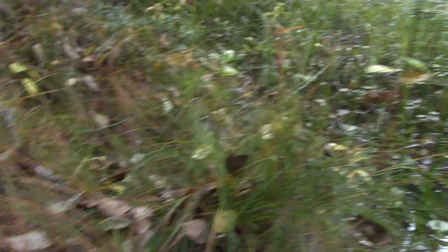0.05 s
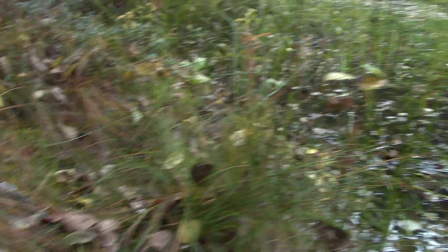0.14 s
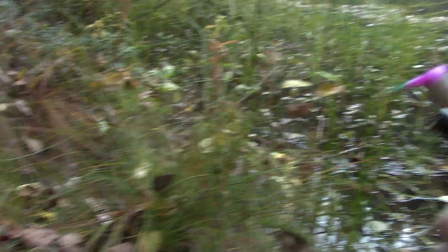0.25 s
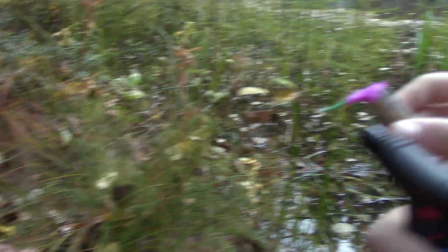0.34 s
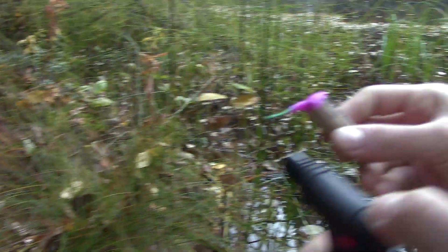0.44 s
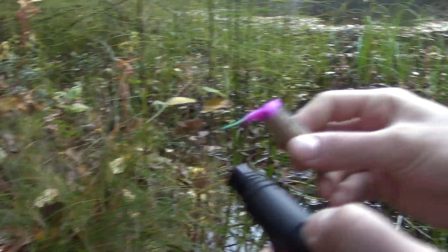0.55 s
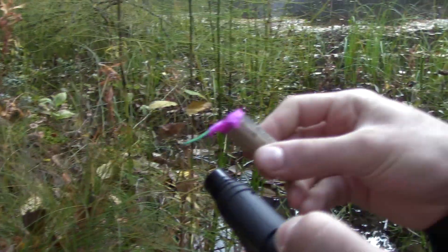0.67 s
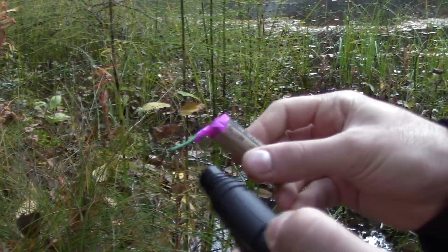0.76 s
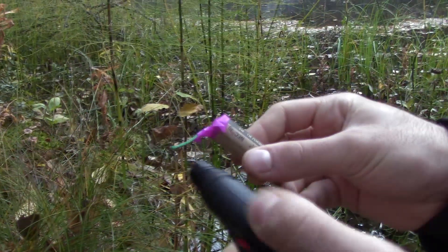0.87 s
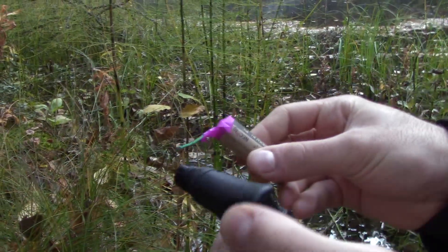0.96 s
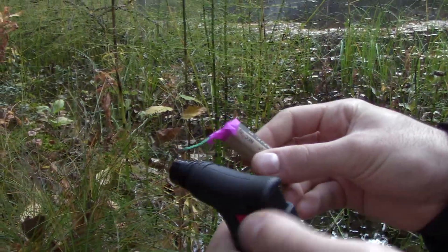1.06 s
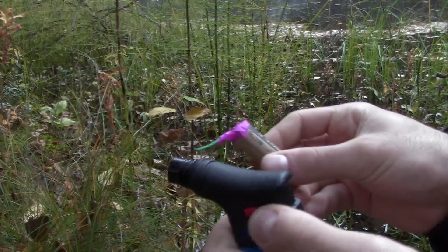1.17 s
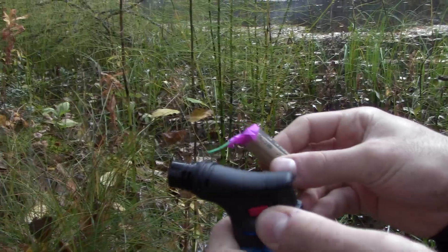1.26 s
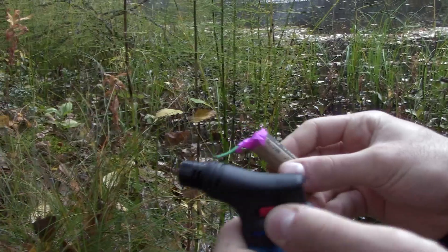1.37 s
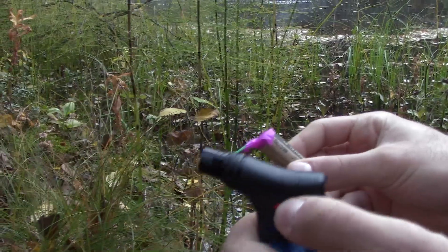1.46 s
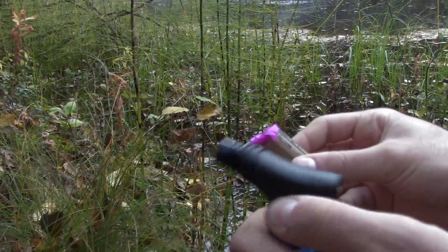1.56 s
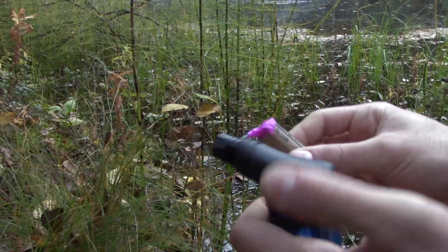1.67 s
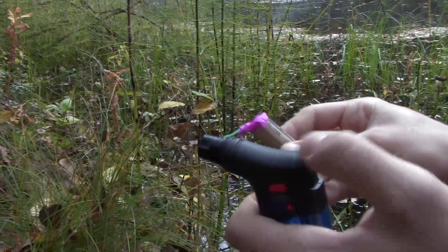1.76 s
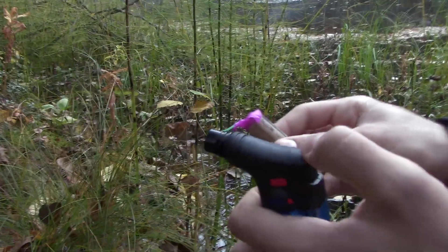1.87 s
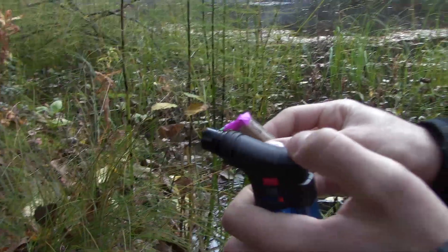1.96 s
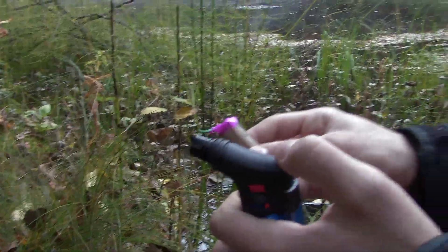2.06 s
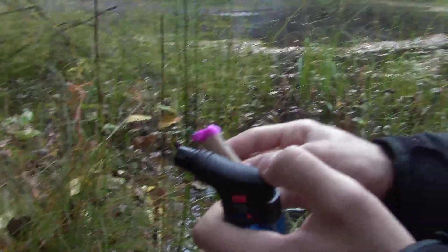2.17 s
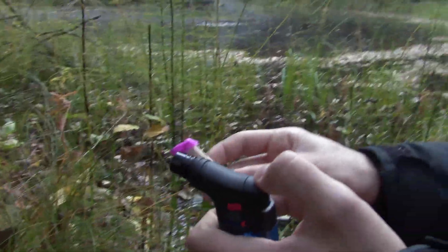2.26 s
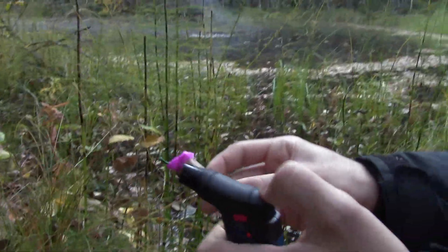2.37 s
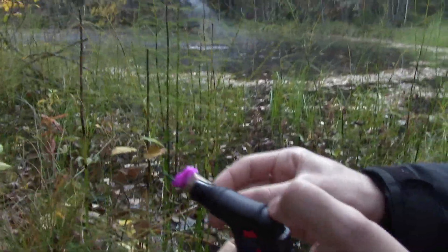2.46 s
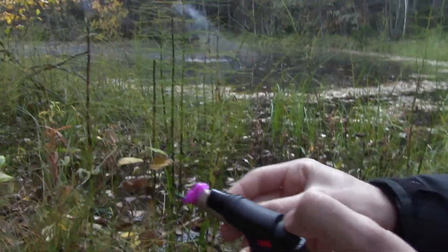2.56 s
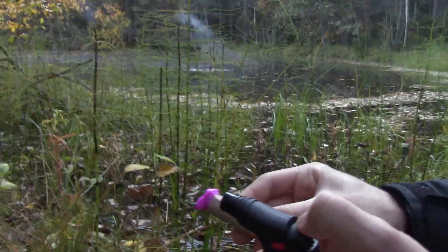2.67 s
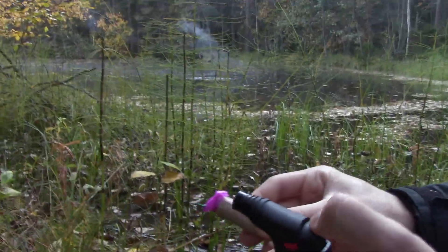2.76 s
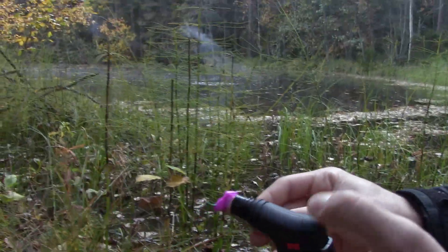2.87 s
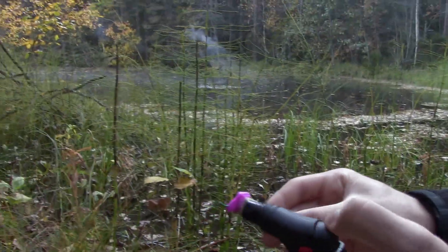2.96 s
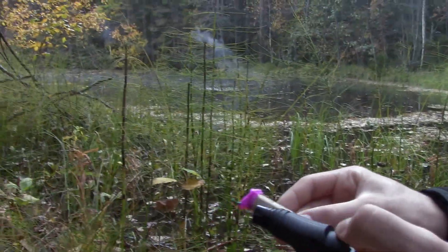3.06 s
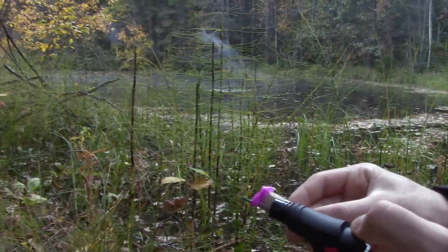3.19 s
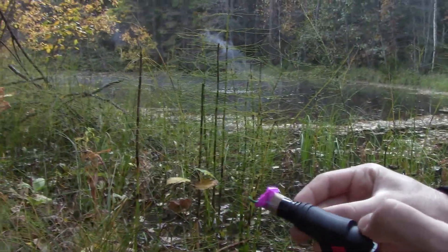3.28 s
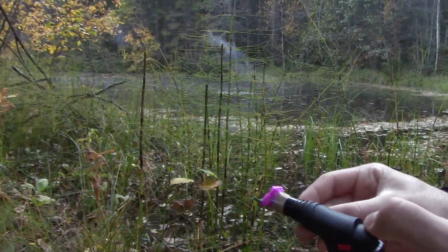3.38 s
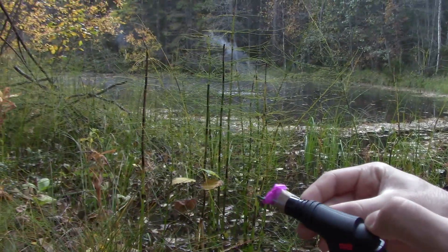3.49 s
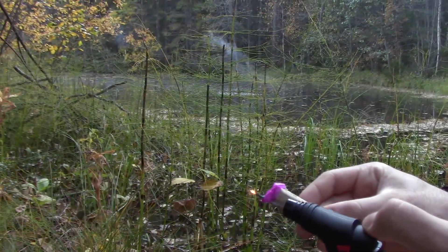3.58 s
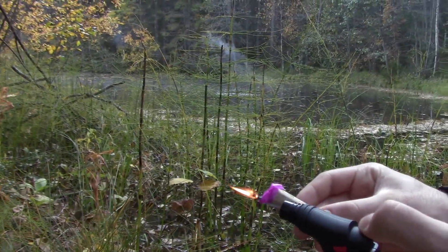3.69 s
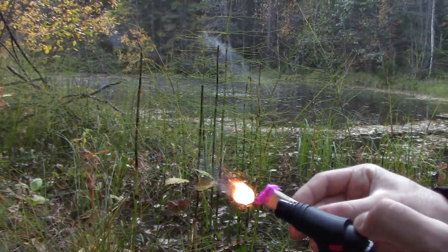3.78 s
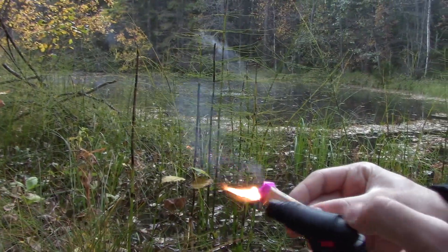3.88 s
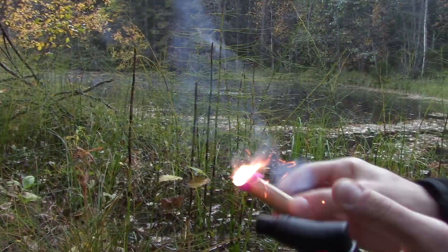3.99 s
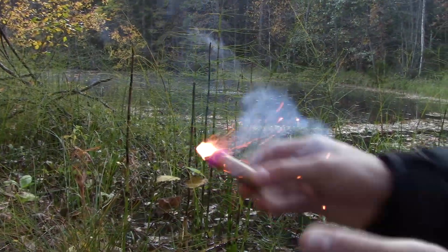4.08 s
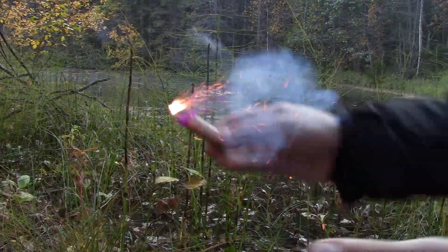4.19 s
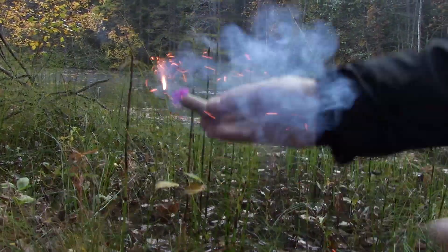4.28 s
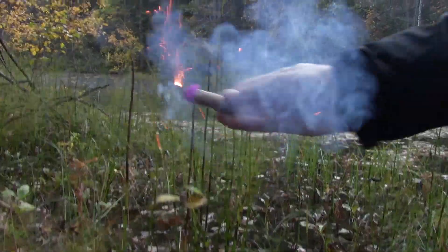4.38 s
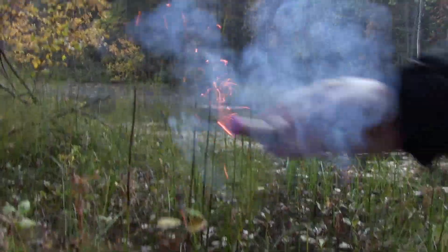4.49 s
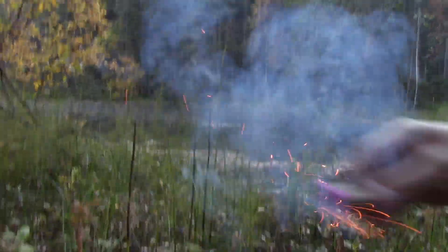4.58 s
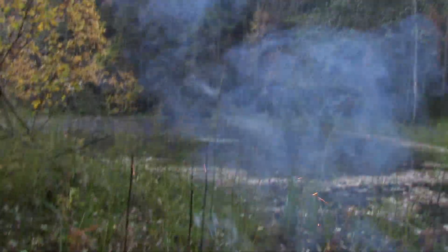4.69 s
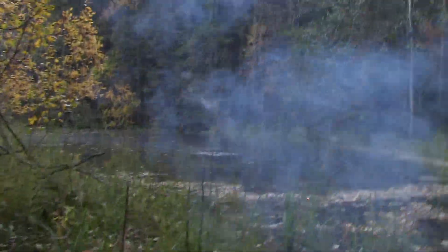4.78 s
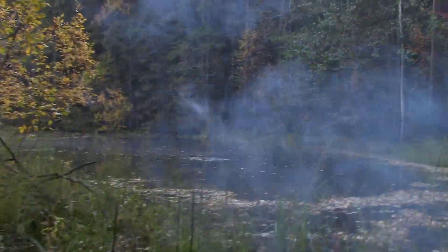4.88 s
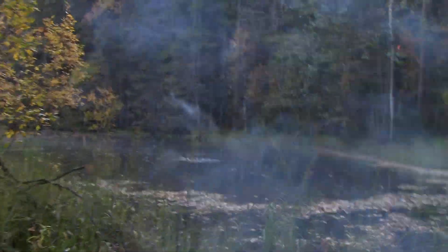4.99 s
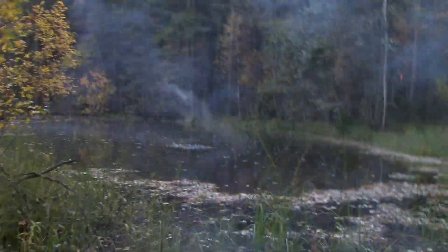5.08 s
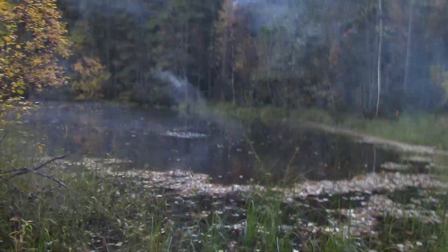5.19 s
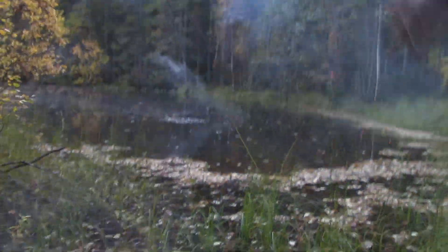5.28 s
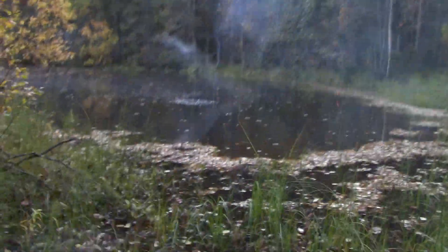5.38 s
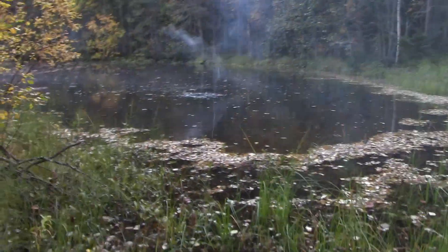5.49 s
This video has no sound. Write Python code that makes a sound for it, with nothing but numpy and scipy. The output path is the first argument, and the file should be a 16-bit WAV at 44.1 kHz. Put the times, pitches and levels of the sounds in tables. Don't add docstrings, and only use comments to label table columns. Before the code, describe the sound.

Close outdoor sound by a forest pond, over a faint steady wash of leaves. Sleeves and grass rustle while a plastic torch lighter ticks in the fingers. A sharp snap releases only hissing gas; a second lights a roaring flame. A fuse catches, fizzes, swells with crackling pops and a tiny rising whistle, then fades as it is thrown.

```python
import sys
import numpy as np
from scipy import signal
from scipy.io import wavfile
from scipy.ndimage import map_coordinates

SR = 44100
rng = np.random.default_rng(int(sys.argv[2]) if len(sys.argv) > 2 else 0)


def rack_gain(trim_db):
    fader = np.asarray(trim_db, float)
    return 10 ** (fader / 20)


def store_pcm(level_fs):
    pcm = np.round(np.clip(level_fs, -1, 1) * 32767).astype(np.int16)
    wavfile.write(sys.argv[1], SR, np.atleast_2d(pcm).T)


N = 244529

# frequency in Hz, level in dB per Hz.
FOREST_COLOUR = [(15, -50), (25, -29), (255, -10), (361, -9), (620, -4), (981, -8.5), (1060, -8),
                 (1430, -12), (2200, -21), (2520, -31), (2730, -26), (3490, -26), (5090, -35),
                 (6490, -30.5), (15800, -45)]
# frequency in Hz, level in dB per Hz.
CLOTH_COLOUR = [(1060, -36), (1800, -5.5), (2260, -3), (2890, -6), (4900, -1.5), (6430, -2), (13400, -13.5),
                (15800, -23.5)]
# frequency in Hz, level in dB per Hz.
NOZZLE_COLOUR = [(1760, -50), (3000, -20.5), (4620, -23), (5020, -17), (6440, -16), (8000, -1), (9200, -2),
                 (12100, -18.5), (15800, -12.5)]
# frequency in Hz, level in dB per Hz.
FLAME_COLOUR = [(59, -55), (100, -21), (159, -18), (201, -21), (249, -13), (295, -18.5), (533, -3),
                (814, -2), (1710, -1), (3450, -10.5), (4300, -17.5), (5140, -19.5), (7530, -18.5),
                (13300, -25), (15800, -27.5)]
# frequency in Hz, level in dB per Hz.
FUSE_COLOUR = [(59, -47), (100, -19), (307, -4.5), (593, -1), (659, -3.5), (1540, -3.5), (1980, -4.5),
               (2160, -4.5), (2780, -5.5), (4160, -8.5), (9500, -13), (14800, -24), (15800, -26)]
# frequency in Hz, likeness (1 is identical).
LIKENESS = [(60, 0.98), (180, 0.96), (550, 0.99), (1650, 1), (4970, 0.96), (15000, 1)]

# time in seconds, level in dB, seconds to fall 20 dB.
GUSTS = [
    (3.95, -58, .12),
    (4.22, -62, .15),
    (4.525, -52, .07),
    (4.85, -64, .3),
    (5.23, -46, .04),
    (5.33, -46, .06),
    (5.375, -49, .04),
    (5.45, -50, .05),
]
# peak in seconds, level in dB, crispness in dB,
# rise and fall in seconds per 20 dB.
STROKES = [(0.0, -53, 1, .01, .2), (0.12, -62, -8, .1, 1.2), (.28, -65, 2, .08, .08),
           (1.165, -66, 12, .09, .01), (1.452, -64, -2, .02, .015), (1.6, -47.5, 2.5, .11, .07),
           (1.66, -55, -16, .16, .012), (1.813, -68, -12, .04, .04), (2.03, -65, -4, .02, .06),
           (2.12, -65, 5, .22, .16), (2.314, -67, 3, .02, .05), (2.4, -64, -6, .06, .25),
           (2.98, -66, -6, .15, .3)]
# start in seconds, level in dB,
# centre in Hz, length in seconds.
BRUSHES = [(0.0, -50, 10500, .022), (.008, -54, 3500, .012), (1.437, -62, 7000, .015),
           (1.62, -51, 4800, .04), (2.1, -62, 9500, .02), (2.18, -66, 11000, .008),
           (2.501, -47, 8700, .012), (2.583, -38, 12000, .005), (2.59, -47, 6600, .03),
           (3.076, -42, 6800, .03), (4.452, -40, 9000, .008), (4.512, -36, 5300, .012),
           (4.54, -37, 6800, .035), (4.645, -40, 6800, .035), (4.68, -47, 12000, .03),
           (4.92, -45, 8000, .03), (5.06, -51, 6000, .04), (5.231, -47, 5600, .013),
           (5.248, -54, 7500, .006), (5.262, -54, 5500, .012), (5.43, -60, 6200, .1)]

# frequency in Hz, level in dB, 60 dB decay in seconds.
SHELL = [(1443, -2, 0.0087), (1650, -6, 0.0068)]
# frequency in Hz, level in dB, 60 dB decay in seconds.
GRIP = [(2200, -1.5, .012), (3007, 9.5, 0.0069), (3310, -7, 0.017), (3840, -14.5, 0.017),
        (4670, -16, 0.0084)]
# frequency in Hz, level in dB, 60 dB decay in seconds.
LATCH = [(5200, -10, 0.015), (6000, -5, 0.0083), (6590, 7.5, 0.0082), (7060, 4, 0.012), (7430, 2.5, 0.0066),
         (9100, -9.5, 0.0058), (9600, -6.5, 0.0033)]
# frequency in Hz, level in dB, 60 dB decay in seconds.
EDGE = [(10800, -4.5, 0.015), (11770, 2.5, 0.013), (13400, -1, 0.015), (14300, -22, 0.0093)]
# frequency in Hz, level in dB, 60 dB decay in seconds.
SPRING = [(2850, -7, 0.038), (3330, -6, 0.048), (3470, -9, 0.022), (5960, -7, 0.022), (6550, 2.5, 0.025),
          (7100, -13, .02), (9120, -1.5, .02)]
CRACK_BANDS = [(1150, 1900), (2000, 5300), (5500, 10300), (10300, 15000)]
# time in seconds, catch in dB, spring in dB.
SNAPS = [
    (2.5806, -21.5, -13),
    (3.0712, -44, -19),
]
# time in seconds, shell, grip and latch in dB (energy per ms),
# pitch of the held grip in Hz.
HANDLING = [(0.0721, -46, -47, -58, 2300), (0.1614, -29, -39, -48, 3200), (.176, -44, -50, -52, 3000),
            (0.3903, -33, -36, -47, 3250), (.4088, -45, -52, -62, 2600), (.425, -58, -50, -52, 3500),
            (0.4372, -31, -36, -41, 2430), (0.449, -55, -47, -48, 4400), (0.496, -56, -42, -45, 3000),
            (0.5104, -41, -49, -56, 4500), (0.5254, -40, -30, -36, 2580), (0.5826, -40, -32, -34, 2690),
            (0.6114, -42, -29, -30, 2690), (0.6468, -42, -29, -27, 2950), (0.6904, -37, -29, -31, 2580),
            (.721, -60, -52, -56, 4400), (0.7461, -38, -29, -31, 2450), (0.8539, -30, -27, -29, 2450),
            (0.8606, -29, -28, -25, 4600), (0.874, -50, -44, -52, 3300), (0.8852, -32.5, -47, -68, 2500),
            (0.9091, -44, -28, -38, 2710), (0.9175, -39, -44, -62, 2800), (1.1123, -55, -48, -52, 3500),
            (1.1682, -36, -38, -31, 3800), (1.8692, -29.5, -41, -44, 3050), (1.928, -36.5, -35, -30, 3120),
            (2.2429, -31, -38, -46, 3250), (2.2527, -41, -52, -62, 2600), (2.39, -36, -47.5, -56, 2600),
            (2.422, -43, -53, -53, 2600), (2.4364, -39, -54, -57, 2600)]
# time in seconds,
# shell, grip and latch in dB, pitch of the latch in Hz.
TRIGGER = [(2.5048, -37, -58, -39, 8970), (2.5803, -31, -46, -42, 7000), (2.5811, -16.5, -16, -1.5, 8200),
           (2.5834, -34, -27, -19, 7500), (2.8307, -36, -44, -36, 8900), (2.8692, -39, -60, -60, 7000),
           (2.8729, -20, -25, -17, 8900), (2.8735, -26, -24, -16, 7900), (2.926, -62, -62, -59, 8500),
           (2.958, -16, -33, -38, 6900), (2.9654, -40, -48, -50, 8500), (3.0334, -35, -46, -42, 7000),
           (3.0717, -15.5, -11, -.5, 7800), (3.0739, -32, -20, -15, 7300), (3.0758, -40, -27, -23, 8500),
           (3.9354, -28, -37, -34, 8000), (3.9636, -24, -20, -15, 8900), (5.1367, -34, -33, -39, 5700),
           (5.3149, -46, -38, -41, 7000), (5.3353, -42, -46, -50, 5800), (5.356, -56, -52, -49, 5800),
           (5.372, -46, -50, -62, 6000), (5.453, -40, -43, -56, 5500)]
# time in seconds, extra edge in dB.
SHARP = [(.4372, 3), (.5254, 5), (.5826, 13), (.6114, 12), (.6468, 10), (.6904, 11), (.7461, 12),
         (.8539, 12), (.8606, 10), (1.1682, 14), (1.928, 7), (3.9354, 10), (5.3149, 12)]
# time in seconds, level in dB, pitch in Hz.
ANSWERS = [(.07199, -48, 4900), (.52529, -38, 4500), (.58249, -38, 4900), (.61129, -37, 4400),
           (.64669, -35, 4400), (.6904, -36, 5600), (.7461, -40, 5800), (.8539, -36, 3500),
           (.8606, -36, 3400), (1.92789, -37, 4500), (2.5816, -22, 2900), (2.958, -29, 2750),
           (3.0722, -19, 2000), (3.9643, -19, 3800), (5.13659, -36, 4600), (5.3158, -42, 5300),
           (5.3162, -41, 1000), (5.337, -46, 1000)]
# time in seconds, level in dB,
# pitch in Hz, cycles.
THUDS = [(0.169, -44, 253, 5.5), (.19, -38.5, 230, 5.5), (1.602, -34, 1300, 5.5), (1.6, -46, 120, 5.5),
         (2.507, -43, 280, 5.5), (2.581, -33, 300, 2.2), (2.5812, -19, 2200, 7), (2.83, -40, 240, 4),
         (2.958, -32, 850, 3.5), (3.0717, -33, 430, 2.6), (3.0717, -34, 900, 4), (3.934, -33, 167, 5.5),
         (3.9637, -34, 500, 2.5), (4.52, -34, 151, 5.5), (5.214, -38, 120, 3.5), (5.2522, -32, 480, 2.6)]

# time in seconds, pitch in Hz, level in dB.
WHISTLE = [
    (4.196, 1490, -55),
    (4.201, 1530, -32),
    (4.2085, 1640, -42),
    (4.215, 1760, -29.5),
    (4.224, 1880, -25),
    (4.233, 1980, -29.5),
    (4.24, 2030, -27.5),
    (4.252, 2060, -34),
    (4.259, 2030, -56),
]
# start in seconds,
# level in dB, centre in Hz, length in seconds.
SPITS = [(1.615, -58, 5600, 0.045), (2.502, -54, 8000, .009), (2.586, -47, 5000, .026),
         (2.829, -51, 7000, .004), (2.983, -52, 6500, .0015), (3.005, -52, 7000, .0015),
         (3.034, -45, 6500, 0.0056), (3.075, -47, 6000, 0.035), (4.235, -35, 3000, .01),
         (4.402, -33, 2200, 0.012), (4.419, -34, 2500, 0.007), (4.448, -34, 2500, 0.0098),
         (4.514, -28, 3000, 0.013), (4.535, -30, 1500, 0.018), (4.17, -39, 2200, .06), (4.5, -34, 500, .07),
         (4.562, -30, 2200, .01), (4.748, -29.5, 2800, 0.03), (4.826, -32, 3500, 0.015),
         (4.845, -30.5, 2970, 0.0075), (4.905, -34, 2600, .02), (4.9, -37, 450, 0.05),
         (4.985, -37, 400, 0.04), (5.216, -43, 1100, 0.01), (5.236, -42, 1400, .018),
         (5.225, -46, 1600, .006), (5.2525, -38, 900, 0.005), (5.27, -46, 2200, .004),
         (5.46, -42, 600, 0.007)]
# time in seconds, peak in dB.
POPS = [(4.0532, -32), (4.1189, -30), (4.1753, -26), (4.2401, -22), (4.2916, -30), (4.4066, -17),
        (4.409, -16.5), (4.4167, -21), (4.422, -23), (4.4539, -20), (4.4835, -27), (4.5088, -25),
        (4.5133, -22), (4.5172, -21), (4.5355, -17), (4.5432, -23), (4.546, -21), (4.5733, -24),
        (4.6612, -27), (4.6777, -26), (4.704, -30), (4.7321, -28), (4.7509, -23), (4.7606, -27),
        (4.7645, -25), (4.8266, -28), (4.8493, -26), (4.8556, -27), (4.8878, -30), (4.9056, -24),
        (4.9125, -27), (4.9965, -32), (5.0501, -31)]
# time in seconds, vigour in dB, treble gain in dB as the jet faces us.
BURN = [(3.685, -70, -2), (3.715, -55, 5), (3.806, -46, 4.5), (3.93, -46, 3), (4.12, -41.5, 3),
        (4.2, -34.5, .5), (4.3, -39.5, -1), (4.38, -41, 1.5), (4.41, -36, 0), (4.445, -38.5, 2.3),
        (4.555, -33, 1.5), (4.6, -37.5, 2.5), (4.84, -38, -4), (4.94, -39.5, -.3), (5.05, -45.5, -.4),
        (5.19, -54, 1), (5.25, -53, -4), (5.55, -61, -3)]
# time in seconds, depth in dB (negative lifts), # half-length in
# seconds.
SIZZLE_DIPS = [
    (3.8, 4.0, .06),
    (4.6, 2.5, .04),
    (5.12, -2.0, .04),
    (3.9, 5.0, .04),
    (4.3, 5.0, .05),
    (4.77, 7.0, .05),
    (4.86, 8.0, .045),
    (4.96, -3.0, .04),
    (5.4, 4.0, .3),
]
# time in seconds, first notch in Hz, strength from 0 to 1,
# distance off to the right from 0 to 1.
HAND = [(2.49, 5700, .1, .1), (3.0, 5600, .39, .06), (3.7, 5300, .22, 0), (3.95, 5400, .38, .13),
        (4.12, 5800, .07, .1), (4.2, 6060, .17, .7), (4.32, 5830, .4, .1), (4.46, 5600, .3, .1),
        (4.52, 5300, .13, .5), (4.59, 5200, .2, .25), (4.66, 5070, .4, .5), (4.8, 6500, .05, 1.05),
        (4.98, 6500, .06, .1), (5.25, 6000, 0, .8), (5.36, 6000, 0, .3), (5.6, 6000, 0, .4)]

# opens at s, shuts at s, flow in dB
UNLIT, LIT = (2.582, 2.836, -54.5), (3.072, 3.955, -40)


def in_time(rows):
    s, *columns = np.transpose(rows)
    return [np.interp(np.arange(N) / SR, s, c, left=-120, right=-120) for c in columns]


def at_hz(points, hz):
    table_hz, value = np.array(points).T
    return np.interp(np.log(hz), np.log(table_hz), value)


def band_pass(x, low, high, order):
    return signal.sosfilt(signal.butter(order, [low, high], "band", fs=SR, output="sos"), x)


def high_pass(x, hz, order):
    return signal.sosfilt(signal.butter(order, hz, "high", fs=SR, output="sos"), x)


def rms_one(x):
    return x / np.sqrt(np.mean(x ** 2) + 1e-20)


def per_ms(x):
    return x / np.sqrt(np.sum(x ** 2) / SR * 1000 + 1e-30)


def drift(rate, size=N):
    r = np.exp(-40 * np.pi * rate / SR)
    noise = rng.standard_normal(size // 20 + 2002)
    slow = signal.lfilter([1], [1, -2 * r, r * r], noise)[2000:]
    return np.interp(np.arange(size) / 20, np.arange(len(slow)), rms_one(slow))


def humps(peaks, floor_db):
    t = np.arange(0, N + 16, 16) / SR
    level = rack_gain(floor_db)
    for s, db, rise, fall in peaks:
        level = level + rack_gain(db - 20 * np.maximum((s - t) / rise, (t - s) / fall))
    return np.interp(np.arange(N) / SR, t, 20 * np.log10(level))


def turbulence(colour, low, high, level_db, patchy_db, apart=1., grit=0., order=3):
    heard = np.flatnonzero(level_db > -100)
    first, size = heard[0], heard[-1] + 1 - heard[0]
    white = rng.standard_normal((2, 2, size))
    grains = np.minimum(rng.exponential(1, size), 2.6) ** 2 * (rng.random(size) < .03)
    white[:, 0] *= np.sqrt(1 + grit * grains)
    edges = np.geomspace(low, high, 2 + int(order * np.log2(high / low)))
    out = 0
    for k, (a, b) in enumerate(zip(edges, edges[1:])):
        centre = np.sqrt(a * b)
        mid, side = band_pass(white[k % 2], a, b, 2)
        alike = np.clip(1 - apart * (1 - at_hz(LIKENESS, centre)), 0, 1)
        flicker = drift(109, size=size // 16 + 1)
        gain = np.repeat(rack_gain(at_hz(colour, centre) + patchy_db * flicker), 16)[:size]
        out = out + gain * (np.sqrt(1 + alike) * mid + np.sqrt(1 - alike) * side * [[1], [-1]])
    shaped = rack_gain(level_db[first:first + size]) * rms_one(out)
    return np.pad(shaped, ((0, 0), (first, N - first - size)))


def puffs(table, below, above):
    out, t = np.zeros(N + 9000), np.arange(9000) / SR
    for s, db, hz, length in table:
        size = 3000 if length < .08 else 9000
        ragged = rng.standard_normal(size) * rack_gain(3.1 * drift(300, size=size))
        puff = rms_one(band_pass(ragged, hz / below, hz * above, 2))
        shape = (1 - np.exp(-t / 0.00079)) * np.exp(-(t / length) ** 2)
        at = round(s * SR)
        out[at:at + size] += rack_gain(db) * puff * shape[:size]
    return out[:N]


def struck(modes, t, luck):
    out = 0
    for k, (hz, db, t60) in enumerate(modes):
        decay = rack_gain(db + 1.9 * luck[0, k] - 60 * t / t60)
        out = out + decay * np.sin(2 * np.pi * hz * (1 + 0.023 * luck[1, k]) * t)
    return out


def bump(hz, cycles, t):
    return per_ms(np.sin(2 * np.pi * hz * t) * t * rack_gain(-60 * t * hz / cycles))


def forest():
    motor_level = np.sqrt(2) * rack_gain(-75 + 1.1 * drift(4.6))
    motor_hz = 69 * (1 + .015 * drift(2.6))
    hum = motor_level * np.sin(2 * np.pi * np.cumsum(motor_hz) / SR)
    leaves = turbulence(FOREST_COLOUR, 25.24, 15770, -50 + 0.22 * drift(4.3), 0.97, apart=10.5)
    return leaves + hum * rack_gain([[1.2], [-1.2]])


def wind():
    gusts = rng.standard_normal((2, N)) * 0.7 + rng.standard_normal(N)
    low = band_pass(gusts, 55, 150, 3)
    level_db = humps([(s, db, length, length) for s, db, length in GUSTS], -95)
    return rack_gain(level_db - 5.0) * rms_one(low * rack_gain(2.2 * drift(9.7))) * rack_gain([[.9], [-.9]])


def rustle():
    still_db = -80
    crisp_shorter = .45
    heard = np.where(np.arange(N) / SR < LIT[0], 0, -120)
    dull = [(s, db, rise, fall) for s, db, _, rise, fall in STROKES]
    crisp = [(s, db + extra, rise * crisp_shorter, fall * crisp_shorter)
             for s, db, extra, rise, fall in STROKES]
    dull_db = humps(dull, still_db) + heard
    crisp_db = humps(crisp, still_db - 3) + heard
    rubbing = 0.97 * drift(41)
    return (turbulence(CLOTH_COLOUR, 1820, 5750, dull_db + rubbing, 1.8, apart=1.5, grit=3.2)
            + turbulence(CLOTH_COLOUR, 6000, 15000, crisp_db + rubbing, 1.1, apart=1.5, grit=3.5))


def soft_thuds():
    out, t = np.zeros(N + 2500), np.arange(2500) / SR
    for s, db, hz, cycles in THUDS:
        at = round(s * SR)
        out[at:at + len(t)] += rack_gain(db) * bump(hz, cycles, t)
    return out[:N]


def grip_answers():
    out, t = np.zeros(N), np.arange(200) / SR
    for s, db, hz in ANSWERS:
        at = round(s * SR)
        out[at:at + len(t)] += rack_gain(db) * bump(hz, 6.5, t)
    return out


def voiced(crack, release, hz):
    if not hz:
        return per_ms(crack)
    share = .65
    pitched = signal.lfilter(*signal.iirpeak(hz, 5.0, fs=SR), release)
    return per_ms(np.sqrt(1 - share) * per_ms(crack) + np.sqrt(share) * per_ms(pitched))


def scattered(click, t):
    scatter = rng.standard_normal((3, len(t))) * t * rack_gain(-60 * t / .02)
    response = per_ms(scatter[0] + 1.3 * scatter[1:])
    tail = signal.fftconvolve(response, click[None])[:, :len(t)]
    return rack_gain(-20) * tail / np.sqrt(SR / 2000)


def torch_click(shell_db, grip_db, latch_db, grip_hz, latch_hz, sharp_db, t):
    soft, snap = latch_db < -22, latch_db > -5
    edge_db = latch_db - 16.5
    if soft:
        edge_db += sharp_db - 8
    lasting = .00016 * (1 + .7 * rack_gain(latch_db))
    contact = rng.standard_normal(len(t)) * t * np.exp(-t / lasting)
    contact[12] = (2.1 if snap else 3.1) * (1 - 1.05 * rack_gain(latch_db)) * np.abs(contact).max()
    release = contact if snap else contact * (np.arange(len(t)) == 12)

    bands = [(low, high, 3) for low, high in CRACK_BANDS]
    if soft:
        bands[1], bands[2] = (2100, 4500, 3), (5400, 8600, 2)
    inner_ring = .12 * (.35 if soft else 1)
    parts = [(SHELL, shell_db, .96, 0), (GRIP, grip_db, inner_ring, grip_hz),
             (LATCH, latch_db, inner_ring, latch_hz), (EDGE, edge_db, .048, 0)]
    luck, click = rng.standard_normal((3, 10)), 0
    for band, (modes, part_db, ring_share, hz) in zip(bands, parts):
        ring = per_ms(band_pass(struck(modes, t, luck) * (1 - np.exp(-t / 0.00058)), *band))
        crack = voiced(*band_pass(np.array([contact, release]), *band), hz)
        click = click + rack_gain(part_db) * per_ms(np.sqrt(ring_share) * ring + np.sqrt(1 - ring_share) * crack)
    if soft and sharp_db < 8:
        click = signal.sosfilt(signal.cheby2(6, 30, 15300, fs=SR, output="sos"), click)
    lean_db = -.15 + 0.55 * luck[2, 0]
    return click * rack_gain([[lean_db], [-lean_db]]) + scattered(click, t)


def torch_clicks():
    out, t = np.zeros((2, N + 2500)), np.arange(2500) / SR
    resting_latch_hz, squeezed_grip_hz = 6900, 3150
    catches = [(s, db - 28.5, db - 1.5, db, resting_latch_hz) for s, db, _ in SNAPS]
    blows = [(*row, resting_latch_hz) for row in HANDLING]
    blows += [(*row[:4], squeezed_grip_hz, row[4]) for row in [*TRIGGER, *catches]]
    for s, *blow in blows:
        sharp_db = sum(db for when, db in SHARP if abs(when - s) < .003)
        at = round((s - .0002) * SR)
        out[:, at:at + len(t)] += torch_click(*blow, sharp_db, t)
    return out[:, :N]


def hammer_spring():
    out, t = np.zeros(N + 2500), np.arange(2500) / SR
    ring = struck(SPRING, t, np.zeros((2, len(SPRING)))) * (1 - np.exp(-t / 0.00086))
    for s, _, spring_db in SNAPS:
        at = round((s + 0.00098) * SR)
        out[at:at + len(t)] += rack_gain(spring_db) * per_ms(ring)
    return out[:N]


def flow(opens, shuts, db):
    valve_s = .009
    t = np.arange(N) / SR
    ramp = np.clip(np.minimum(t - opens, shuts + valve_s - t) / valve_s, 0, 1)
    return np.where(ramp > 0, db - 40 * (1 - ramp), -120), np.maximum(t - opens, 0)


def torch_gas():
    gas_db, gas_s = flow(*UNLIT)
    gas_db = gas_db + 4.5 * np.exp(-gas_s / .03)
    jet = turbulence(NOZZLE_COLOUR, 3000, 16300, gas_db, 0.98, apart=.7, order=6)
    flame_db, flame_s = flow(*LIT)
    flame_db = flame_db - 5 * np.exp(-flame_s / .07) - 2 * np.minimum(flame_s, 1) ** 4
    flame_db = flame_db + 0.41 * drift(20)
    return jet + turbulence(FLAME_COLOUR, 99.4, 16340, flame_db, 0.9, apart=0.065, grit=0.67, order=4)


def whistle():
    hz, level_db = in_time(WHISTLE)
    level = np.sqrt(2) * rack_gain(level_db + 1.3 * drift(150))
    return level * np.sin(2 * np.pi * np.cumsum(hz * (1 + 0.02 * drift(150))) / SR)


def pops():
    per_s, pop_hz, cycles = 350, 2300, 1.6
    burn_db, _ = in_time(BURN)
    bursts = rng.random(N) < per_s / SR
    bursts = bursts * rack_gain(burn_db + 1.5 + 3.5 * np.minimum(rng.exponential(1, N), 3))
    for s, db in POPS:
        bursts[round(s * SR) - 3] += rack_gain(db)
    t = np.arange(150) / SR
    push = np.sin(2 * np.pi * pop_hz * t) * rack_gain(-60 * t * pop_hz / (2 * cycles))
    return high_pass(np.convolve(bursts, rack_gain(3.5) * push / push.max())[:N], 450, 3)


def fuse():
    burn_db, facing_db = in_time(BURN)
    alight, swing = burn_db > -100, burn_db + 40
    roar_db = np.where(alight, -37.5 + .74 * swing - .35 * facing_db, burn_db)
    sizzle_db = np.where(alight, -43 + .8 * swing + .6 * facing_db, burn_db)
    for s, depth_db, length in SIZZLE_DIPS:
        sizzle_db = sizzle_db - depth_db * np.exp(-((np.arange(N) / SR - s) / length) ** 2)
    sputter = 0.8 * drift(38) + 1.2 * drift(110)
    roar = turbulence(FUSE_COLOUR, 99.5, 1580, roar_db + 1.6 * sputter, 1.7, apart=0.1, grit=2.5)
    crackle = turbulence(FUSE_COLOUR, 1600, 5000, burn_db + .6 + 1.46 * sputter, 1.1, apart=0.3, grit=2.1)
    hiss = turbulence(FUSE_COLOUR, 5090, 9700, burn_db + facing_db + 0.89 * sputter, 1.5,
                      apart=0.23, grit=1.3, order=5)
    sizzle = turbulence(FUSE_COLOUR, 9820, 16500, sizzle_db + .7 * sputter, 1.5,
                        apart=.15, grit=1.1, order=5)
    return roar + crackle + hiss + sizzle


def hand_echo(jets):
    first = int(HAND[0][0] * SR) + 1
    jets, n = jets[:, first:], np.arange(N - first)
    notch_hz, strength, offside = [c[first:] for c in in_time(HAND)]
    late = [np.interp(n - SR / notch_hz, n, channel) for channel in high_pass(jets, 1500, 1)]
    left, right = (jets - np.clip(strength, 0, 1) * late) * rack_gain([-.9 * offside, 0.7 * offside])
    lag = 0.26 * offside
    left = map_coordinates(left, [n - lag], order=3)
    right = map_coordinates(right, [n + lag], order=3)
    return np.pad([left, right], ((0, 0), (first, 0)))


def scene():
    steady = rustle()
    jets = hand_echo(torch_gas() + fuse() + puffs(SPITS, 2.44, 1.96) + pops() + whistle())
    steady = steady + high_pass(jets, 70, 2) + wind() + forest()
    clicks = torch_clicks() + hammer_spring() + soft_thuds() + grip_answers()
    steady = steady + puffs(BRUSHES, 1.35, 1.35)
    return clicks + signal.sosfilt(signal.ellip(10, .5, 45, 15800, fs=SR, output="sos"), steady)


def band_limit(x):
    return signal.sosfilt(signal.butter(12, 16780, fs=SR, output="sos"), x)


def record(dry):
    mix = dry - high_pass(dry - np.clip(dry, -.88, .88), 1200, 2)
    mix = signal.sosfilt(signal.ellip(8, .5, 50, 16350, fs=SR, output="sos"), mix)
    mix = high_pass(mix, 35, 2)
    mix = mix - high_pass(mix - np.clip(mix, -.97, .97), 1200, 2)
    return band_limit(np.clip(mix, -1, 1))


dry = scene()
out = record(dry)
store_pcm(out)
```